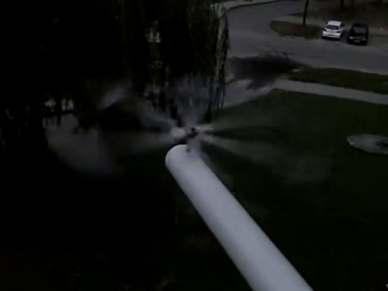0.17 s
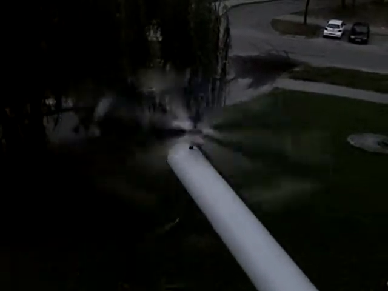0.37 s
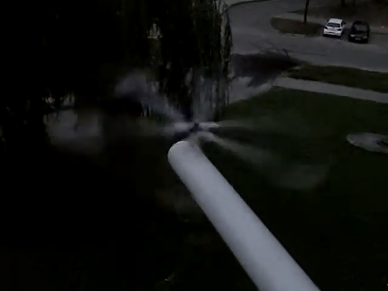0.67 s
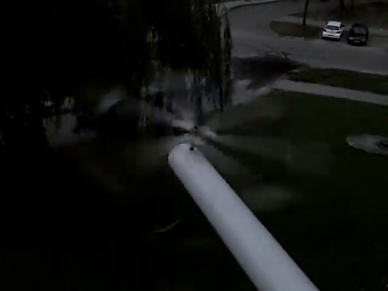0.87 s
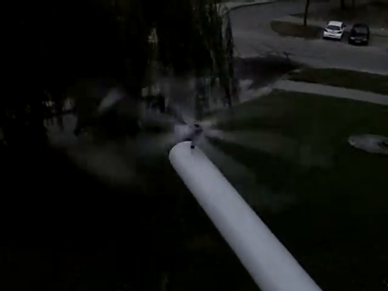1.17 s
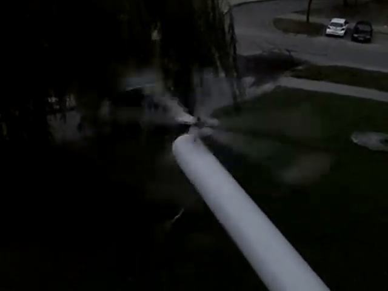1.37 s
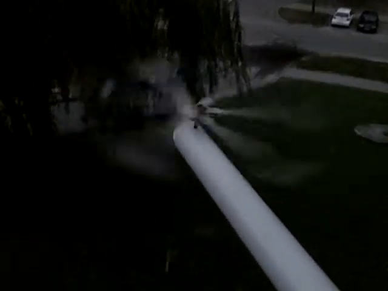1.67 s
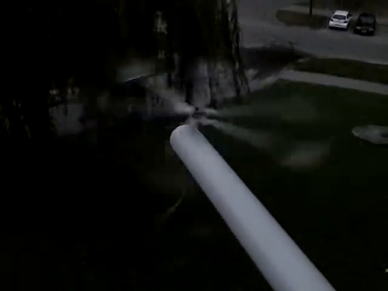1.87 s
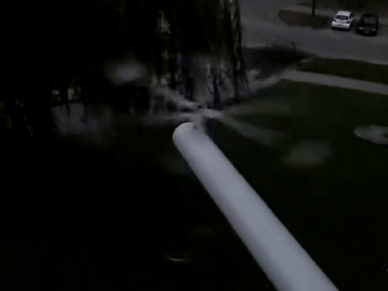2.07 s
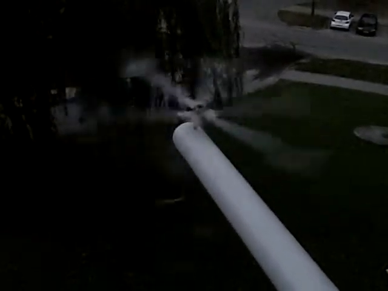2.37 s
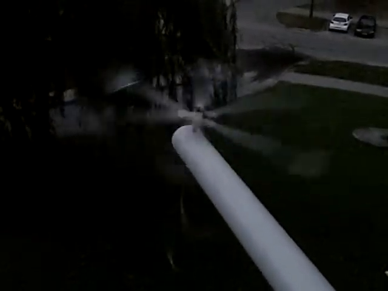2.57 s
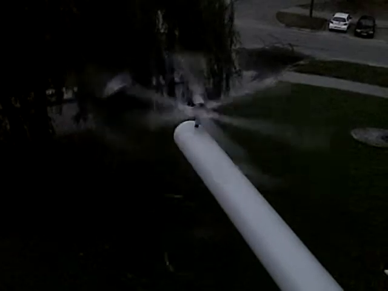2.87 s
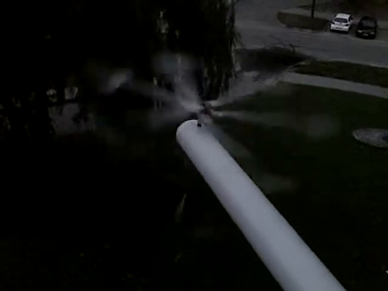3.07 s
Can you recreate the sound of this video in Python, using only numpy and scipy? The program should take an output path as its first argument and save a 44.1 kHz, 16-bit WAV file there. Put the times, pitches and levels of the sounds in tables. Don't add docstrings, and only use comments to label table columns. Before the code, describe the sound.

Low, bassy wind gusts thud against an exposed outdoor microphone, strongest just after one second, then drop away, leaving gentle breeze through a tree, far traffic and a weak, wavering hum from a small wind turbine.

```python
import sys
import numpy as np
from scipy import signal
from scipy.fft import rfft, irfft
from scipy.io import wavfile
from scipy.ndimage import uniform_filter1d

SR = 44100
rng = np.random.default_rng(int(sys.argv[2]) if len(sys.argv) > 2 else 0)


def magnitude_from_level(level_db):
    exponent = np.asarray(level_db, float) / 20
    return 10 ** exponent


def to_wav(sig):
    pcm = np.clip(np.atleast_2d(sig), -1, 1) * 32767
    pcm = np.round(pcm).astype(np.int16)
    wavfile.write(sys.argv[1], SR, pcm.T)


N = 142002
T = np.arange(N) / SR


def curve(table, column=1):
    points = np.array(table)
    return np.interp(T, points[:, 0], points[:, column])


def walk(rate_hz):
    hold = int(SR / rate_hz)
    steps = np.repeat(rng.standard_normal(N // 400 + 2), hold)[:N + hold]
    return 1.2 * uniform_filter1d(uniform_filter1d(steps, hold), hold)[:N]


def airy(colour, level_db, shared_db, own_db, rate_hz):
    octave = np.log2(np.maximum(np.fft.rfftfreq(N, 1 / SR), 1))
    points = np.array(colour, float)
    points_octave = np.log2(points[:, 0])
    below = np.maximum(points_octave[0] - octave, 0)
    above = np.maximum(octave - points_octave[-1], 0)
    gain_db = np.interp(octave, points_octave, points[:, 1]) - 67 * (below + above)
    spectrum = rfft(rng.standard_normal(N)) * magnitude_from_level(gain_db)
    noise = 0
    for centre in np.arange(3, 14, .5):
        share = np.cos(np.pi / 2 * np.clip(2 * (octave - centre), -1, 1)) ** 2
        noise = noise + irfft(spectrum * share, N) * magnitude_from_level(own_db * walk(rate_hz))
    noise = noise * magnitude_from_level(shared_db)
    return noise * magnitude_from_level(level_db) / np.std(noise)


def eddies(start_s, level_db, pitch_hz, cycles, turn):
    half = 4000
    pressure = np.zeros(N + 2 * half)
    span_s = np.arange(-half, half) / SR
    for s, db, hz, phase in zip(start_s, level_db, pitch_hz, turn):
        i = int(s * SR)
        cycle = span_s * hz
        swing = np.exp(-.5 * (cycle / cycles) ** 2) * np.cos(2 * np.pi * (cycle + phase))
        pressure[i:i + 2 * half] += magnitude_from_level(db) * swing
    return pressure[half:N + half]


def strong_eddies():
    # start_s, level_db, pitch_hz
    thumps = [(0.06, -32, 72), (0.098, -38, 95), (0.417, -29.5, 110.7), (0.466, -27.5, 79.7),
              (0.531, -33.5, 103.4), (0.578, -37.5, 110), (0.598, -33.5, 122.6), (0.625, -34, 97),
              (0.657, -32, 67), (0.695, -39.5, 114), (0.746, -32.5, 87), (0.77, -37.5, 70.5),
              (0.818, -42, 63.7), (0.866, -31.5, 73.5), (0.9, -44, 85), (0.951, -32, 123), (1.078, -30, 66),
              (1.179, -31, 117), (1.225, -31.5, 91), (1.254, -27.5, 110), (1.284, -24, 127),
              (1.321, -32.5, 135), (1.349, -28.5, 96), (1.374, -34.5, 80), (1.396, -34, 134),
              (1.425, -36.5, 91), (1.514, -31.5, 106), (1.595, -39, 75), (1.67, -37, 76), (1.696, -36, 80),
              (0.115, -38, 108), (0.164, -42.5, 70), (0.436, -38, 95), (0.454, -36.5, 82), (0.501, -47, 86),
              (0.547, -32, 106), (0.638, -39, 68.6), (0.717, -43, 109), (0.758, -38, 102), (0.841, -37, 70),
              (0.938, -34, 114), (1.032, -43, 78), (1.096, -41.5, 124), (1.113, -46, 100),
              (1.138, -42, 97.5), (1.158, -40, 92.5), (1.2, -32.5, 106), (1.213, -40, 97),
              (1.296, -33, 101), (1.363, -38, 121), (1.384, -36.5, 112), (1.478, -43, 110),
              (1.527, -35.5, 90), (1.657, -40.5, 91)]
    # start_s, level_db, pitch_hz
    puffs = [(0.018, -39, 44.7), (0.136, -45, 61), (.21, -47, 90), (.245, -47, 110), (0.337, -43, 85),
             (.375, -39, 80), (1.061, -34.5, 110), (1.573, -47, 111), (1.741, -42, 80), (1.77, -51, 120),
             (1.92, -47, 45), (2.085, -47, 44), (2.142, -48.5, 42), (2.33, -45.5, 55), (2.478, -56, 50),
             (2.754, -51, 50), (2.853, -44, 54), (2.901, -44, 52), (2.515, -45, 50), (2.66, -48.5, 60),
             (3.105, -42.5, 44.7), (3.139, -42, 60.2)]
    # start_s, level_db, pitch_hz
    rim = [(0.417, -54, 201), (0.464, -44.5, 193), (0.525, -45.5, 229), (0.585, -63, 208),
           (0.596, -50, 229), (0.697, -44.5, 251), (0.745, -55, 261), (0.762, -42.5, 220),
           (0.937, -44, 203), (0.951, -43, 206), (1.061, -40.5, 224), (1.092, -50, 218), (1.178, -51, 218),
           (1.2, -39, 259), (1.226, -42, 209), (1.261, -33.5, 218), (1.272, -34.5, 300), (1.285, -39, 215),
           (1.314, -49, 213), (1.335, -38.5, 217), (1.35, -43, 202), (1.365, -39, 240), (1.379, -41.5, 192),
           (1.403, -51, 206), (1.417, -44, 230), (1.513, -41.5, 212), (1.669, -45, 228),
           (1.697, -49.5, 204), (0.542, -47, 279), (0.627, -47, 271), (1.249, -48, 229), (1.526, -45, 239)]
    large = np.array(list(thumps) + list(puffs), float)
    small = np.array(rim, float)
    body = eddies(large[:, 0], large[:, 1] + 0.5, large[:, 2], 0.29, rng.random(len(large)))
    return body + eddies(small[:, 0], small[:, 1], small[:, 2], 0.47, rng.random(len(small)))


def small_eddies():
    # start_s, level_db, pitch_hz
    gust = [(0, -54, 62), (.1, -36.5, 72.4), (.2, -50.5, 68.6), (.35, -55.5, 69.7), (.44, -39, 79),
            (.6, -44.5, 94), (.85, -40, 75), (1.0, -45, 80.6), (1.09, -41.5, 80), (1.14, -52, 89),
            (1.3, -37.5, 108), (1.45, -49, 90.6), (1.53, -47.5, 91), (1.72, -39, 62), (1.8, -61.5, 58.3),
            (2.5, -58, 51), (3.05, -60, 49.6), (3.22, -61, 49.3)]
    per_s, trim_db, scatter_db, pitch_spread = 70, -5.5, 2.35, 0.49
    chance = rng.random((500, 4))
    start_s = np.cumsum(0.37 + 1.4 * chance[:, 0]) / per_s
    inside = start_s < T[-1]
    chance, start_s = chance[inside], start_s[inside]
    i = (start_s * SR).astype(int)
    level_db = curve(gust)[i] + trim_db - scatter_db * np.log(chance[:, 1] + 0.011)
    pitch_hz = curve(gust, 2)[i] * np.exp(pitch_spread * 3.5 * (chance[:, 2] - .5))
    return eddies(start_s, level_db, pitch_hz, 0.56, chance[:, 3])


def tree():
    # pitch_hz, density_db (per Hz)
    branch_colour = [(450, -12), (608, -2.5), (783, -0.5), (997, -5.5), (1330, -2), (1700, -10),
                     (2600, -20), (3500, -23)]
    # pitch_hz, density_db (per Hz)
    leaf_colour = [(2500, -15), (3500, 5.5), (4500, -2), (5300, 1), (6300, 5), (6900, 1), (7400, -7),
                   (7900, -17)]
    # start_s, leaves_db, branches_db
    breeze = [(0, -1, -1), (.25, -2, -0.5), (.4, -1, 1.5), (.5, -1.5, -0.6), (.62, -1.5, 0.5),
              (.8, -0.5, 0.5), (1, -1.5, -0.3), (1.3, -0.5, -0.2), (1.55, 0, -1.5), (1.8, -0.5, 0),
              (2.1, 0.5, -0.5), (2.4, 2, 1), (2.7, 0, 0.7), (2.9, 1.5, 0.2), (3.1, 2.5, 1), (3.22, 3, 0)]
    branch_swell_db = curve(breeze, 2) + 0.3 * walk(15)
    leaf_swell_db = 0.88 * curve(breeze) + 0.63 * walk(17)
    branches = airy(branch_colour, -55.5, branch_swell_db, 0.99, 10)
    return branches + airy(leaf_colour, -71.5, leaf_swell_db, 0.093, 10)


def traffic():
    # pitch_hz, density_db (per Hz)
    drone_colour = [(15, -20), (25, 2.5), (53, -2.5), (81, -16), (141, -11.5), (270, -14.5), (390, -16),
                    (520, -20.5)]
    return airy(drone_colour, -54, .4 * walk(6), 1.0, 8)


def generator():
    # start_s, pitch_hz, level_db
    hum = [(0, 103.2, -64.5), (1.8, 107, -68.5), (1.89, 112.1, -51), (1.98, 110.1, -65),
           (2.11, 110.5, -56.5), (2.17, 111.5, -66), (2.28, 115.2, -55.5), (2.43, 114.9, -73.5),
           (2.54, 116.8, -50.5), (2.63, 117.6, -68), (2.67, 116.6, -56.5), (2.73, 119.4, -59),
           (2.79, 116.9, -55), (2.87, 116.6, -63.5), (3.0, 120.5, -54), (3.22, 118.5, -57)]
    level_db = curve(hum, 2) + 2.2 * walk(33)
    pitch_hz = curve(hum) * (1 + 0.0072 * walk(22))
    return magnitude_from_level(level_db) * np.sqrt(2) * np.sin(2 * np.pi * np.cumsum(pitch_hz) / SR)


def mount():
    # pitch_hz, level_db
    resonances = [(613.6, -68), (777, -72.5), (845.4, -70), (391, -71.5), (274.5, -72.5)]
    width_hz = 18
    whine = np.zeros(N)
    for hz, db in resonances:
        b, a = signal.iirpeak(hz, hz / width_hz, fs=SR)
        ring = signal.lfilter(b, a, rng.standard_normal(N))
        whine = whine + magnitude_from_level(db) * ring / np.std(ring)
    return whine


def ticks():
    # start_s, peak_db, pitch_hz, half_width (relative to pitch)
    clear = [(.352, -53, 3000, .09), (0.692, -59, 5450, .4), (.753, -56, 5000, .5),
             (0.886, -57.5, 5200, 0.4), (1.005, -62, 3970, .15), (1.135, -63, 5030, .15),
             (1.258, -63, 6090, .05), (1.268, -58, 3080, .03), (0.35, -57, 5530, .4),
             (2.317, -60, 5000, 0.47), (2.319, -57, 6400, .05), (2.92, -60, 4020, .12)]
    rustle_per_s, rustle_db, rustle_half_width = 14, -72.5, 0.36
    attack_s, decay_s, length = .001, 0.0059, 2000
    chance = rng.random((80, 3))
    start_s = np.cumsum(2 * chance[:, 0]) / rustle_per_s
    peak_db = rustle_db + 4 * chance[:, 1]
    pitch_hz = 2200 + 4000 * chance[:, 2]
    faint = np.c_[start_s, peak_db, pitch_hz, np.full(len(chance), rustle_half_width)]
    shape = (1 - np.exp(-T[:length] / attack_s)) * np.exp(-T[:length] / decay_s)
    sound = np.zeros(N + length)
    for s, db, hz, width in list(clear) + list(faint):
        band_hz = [hz * (1 - width), hz * (1 + width)]
        sos = signal.butter(2, band_hz, "band", fs=SR, output="sos")
        burst = signal.sosfilt(sos, rng.standard_normal(length))
        i = min(int(s * SR), N)
        sound[i:i + length] += magnitude_from_level(db) * burst / np.std(burst) * .6 * shape
    return sound[:N]


def scene():
    wind = strong_eddies() + small_eddies()
    turbine = generator() + mount()
    return (wind + tree() + traffic() + turbine + ticks())[None]


def band_limit(x):
    return signal.sosfilt(signal.butter(12, 8070, fs=SR, output="sos"), x)


def record(dry):
    x = signal.sosfilt(signal.butter(1, 13, "high", fs=SR, output="sos"), dry)
    centre_hz, width_hz, edge_hz, flutter_db = 7020, 350, 150, 7
    away_hz = abs(np.fft.rfftfreq(N, 1 / SR) - centre_hz)
    share = np.clip((width_hz / 2 - away_hz) / edge_hz + .5, 0, 1)
    top = irfft(rfft(x) * share, N)
    x = x + top * (magnitude_from_level(flutter_db * np.clip(walk(109), -2, .3)) - 1)
    x = signal.sosfilt(signal.butter(12, 7250, fs=SR, output="sos"), x)
    x = signal.sosfilt(signal.ellip(8, .2, 70, 7650, fs=SR, output="sos"), x)
    return band_limit(x)


dry = scene()
out = record(dry)
to_wav(out)
```